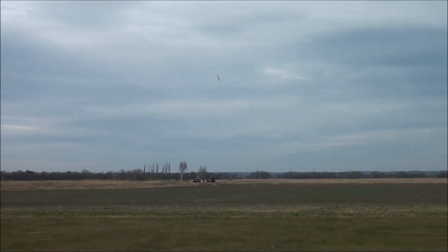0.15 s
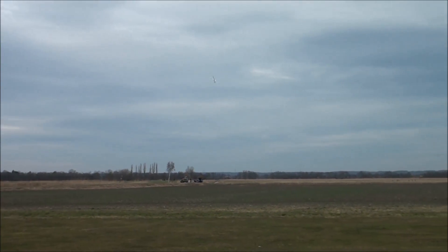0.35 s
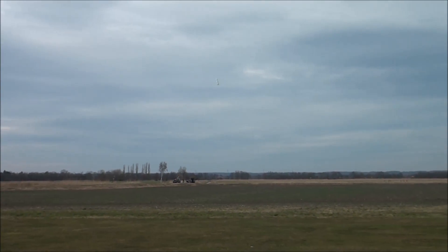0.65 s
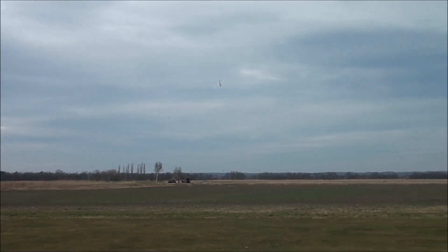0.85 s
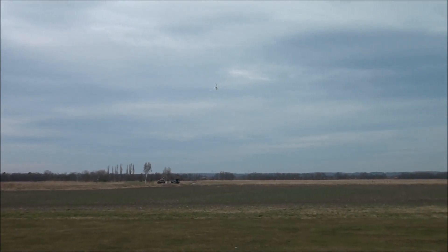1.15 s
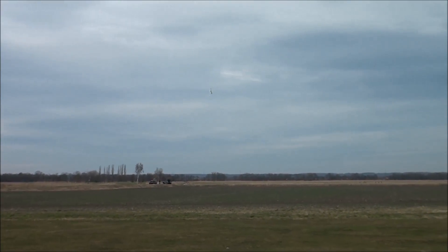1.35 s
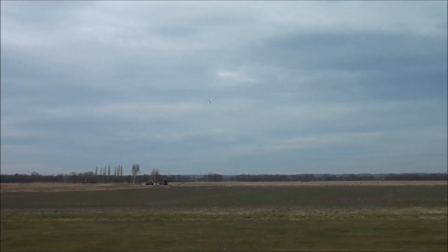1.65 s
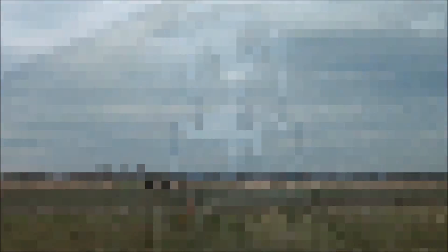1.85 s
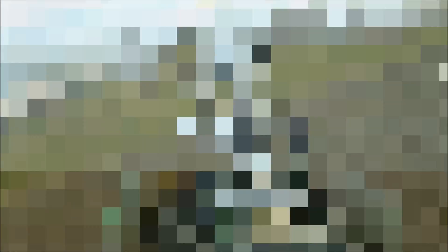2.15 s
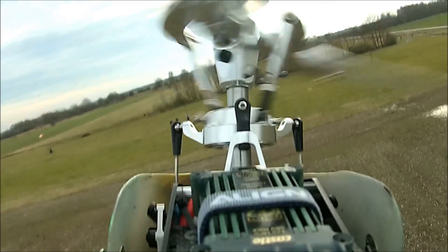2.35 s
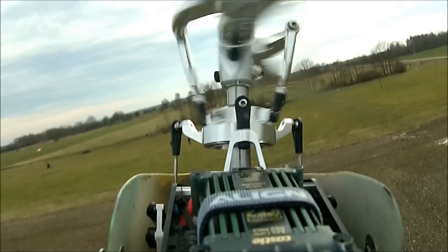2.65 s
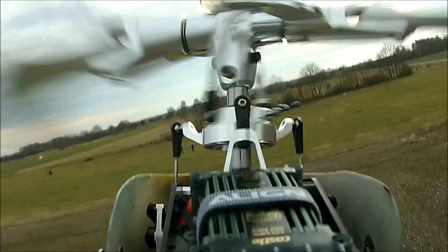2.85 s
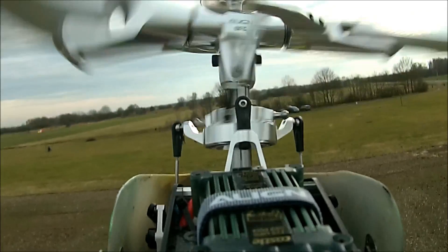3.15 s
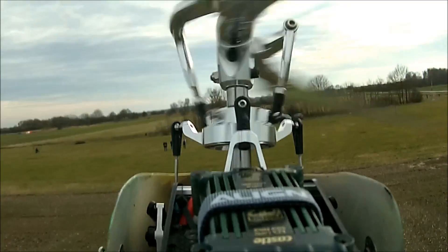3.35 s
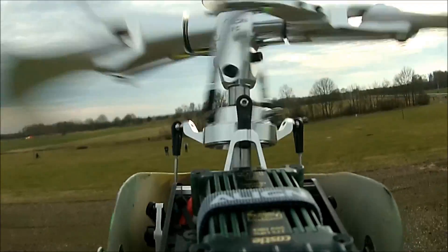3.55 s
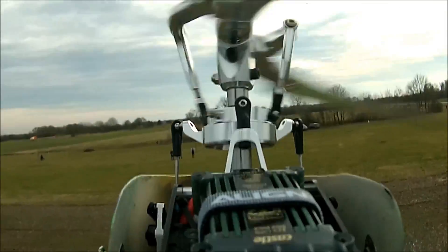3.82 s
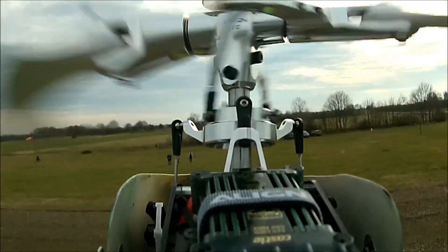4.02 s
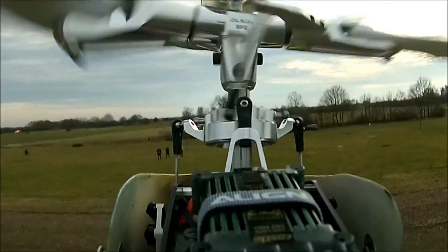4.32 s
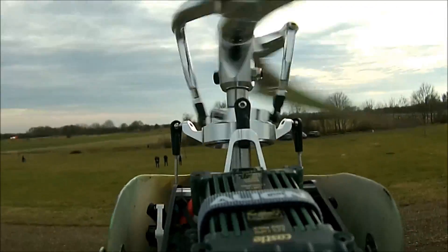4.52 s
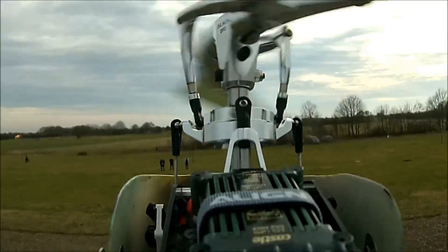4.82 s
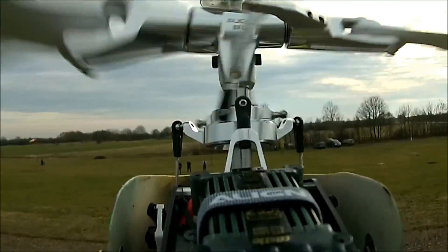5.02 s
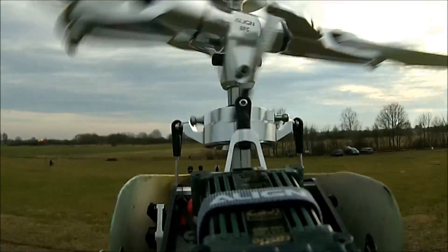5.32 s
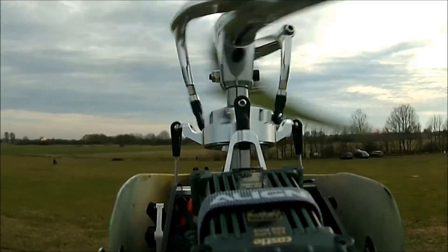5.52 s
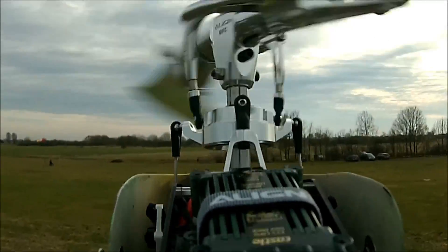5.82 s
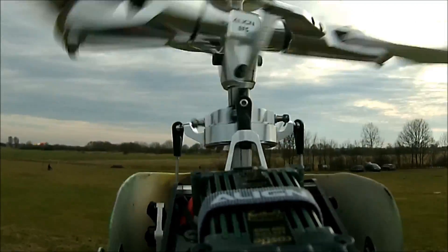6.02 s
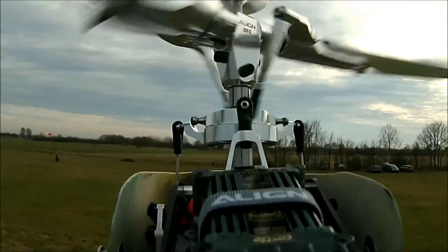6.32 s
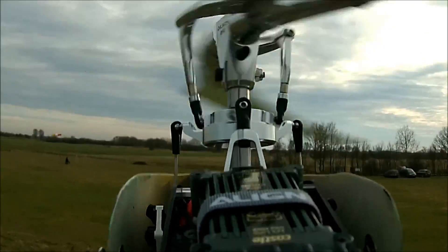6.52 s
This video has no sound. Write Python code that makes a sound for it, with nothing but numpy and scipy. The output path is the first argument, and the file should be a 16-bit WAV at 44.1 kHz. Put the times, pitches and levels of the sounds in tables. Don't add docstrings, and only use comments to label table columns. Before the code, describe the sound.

From 0 to about 1.9 s, a stereo microphone stands in a windy open field. A heavy low gust opens the sound, followed by shorter dull thumps and fluttering edges that shift between left and right, easing by 1.3 s with another soft buffet near 1.5 s. Behind it, a distant model helicopter gives a thin motor tone around 600 Hz, rising slightly, with higher gear whine and hissy air chopped about seventy times a second; a brief crisp blade slap fades early and the machine recedes. Around 1.9-2.1 s it crossfades to a mono microphone on the airframe. A harsh, overloaded square-wave drone near 340 Hz holds almost constant pitch until 6.6 s, with metallic rattle, sharp chatter and gritty hiss pulsing about 23 times a second. The roughness swells and eases; level rises modestly by 4.3 s. It ends still running.

```python
import sys
import numpy as np
from scipy import signal
from scipy.fft import rfft, irfft, next_fast_len
from scipy.io import wavfile
from scipy.ndimage import uniform_filter1d, map_coordinates

SR = 44100
rng = np.random.default_rng(int(sys.argv[2]) if len(sys.argv) > 2 else 0)


def how_loud(loudness_db):
    steps = np.asarray(loudness_db, float) / 20
    return 10 ** steps


def pcm_store(signal):
    levels = np.round(np.clip(np.atleast_2d(signal), -1, 1) * 32767)
    wavfile.write(sys.argv[1], SR, levels.astype(np.int16).T)


N = 294147
TIME_S = np.arange(N) / SR

# start_s, peak_db, left_minus_right_db
SMALL_EDDIES = [(0.222, -3, -2), (0.315, -18, -5), (0.767, -7, 4), (0.798, -24, 0), (1.193, -12, 20),
                (1.59, -4.5, 6), (1.705, -21, 12), (1.806, -17, 11), (1.829, -13, 7), (1.874, -26, -4)]
BIG_EDDIES = [(0.003, 8.5, -3), (0.049, -9, 3), (0.07, 8, -6), (0.099, 3, -8), (0.156, -11, -4),
              (0.177, -1, -0.5), (0.209, -9, 6), (0.266, 2, -2), (0.282, 0, 6), (0.321, -6, -10),
              (0.332, 3, 6), (0.42, -3.5, 10), (0.463, -3.5, -1.5), (0.568, 1.5, 5), (0.725, -22, -2),
              (0.789, -10, 4), (0.814, -17, -1), (1.033, -24, 4), (1.192, -0.5, 1), (1.525, -17, 1),
              (1.615, -2.5, 5), (1.705, -6.5, 2), (1.75, -11, 0.5), (1.818, -2, 2), (1.88, -12, 2)]
SMALL_EDDY_HZ, BIG_EDDY_HZ = 560, 161.5
# start_s, hold_s, buffet_db, sharp_edge_db
GUSTS = [(0, 0.25, -3.5, -3), (0.225, 0.013, -14.5, 2.5), (0.33, 0.03, -8, -7), (.41, 0.052, -16.5, -3.5),
         (0.55, 0.034, -14, -0.5), (0.743, 0.079, -10, -4), (1.148, 0.052, -19.5, -4),
         (1.36, 0.016, -25, -9), (1.496, .13, -18.5, -7.5), (1.707, 0.028, -18.5, -3),
         (1.819, 0.086, -24, 5.5)]
GUST_RISE_S, GUST_FALL_S = 0.036, 0.034
# time_s, level_db
BREEZE = [(0, -27), (.7, -14), (1, -21.5), (1.3, -27), (1.93, -30), (2.06, -35)]
BREEZE_EDGE_DB = -12
# frequency_hz, level_db_per_hz
BUFFET_COLOUR = [(12, -42), (20, -8), (114, 2.5), (173, -11), (242, -5.5), (280, -12.5), (398, -17.5),
                 (500, -40), (650, -68), (1100, -120)]
EDGE_COLOUR = [(120, -1), (200, -3), (396, -13), (758, -29), (824, -27), (1500, -44.5), (1950, -63),
               (3300, -120)]

# time_s, level_db, gear_side_db
FAR_PATH = [(0, -38, -11), (.15, -38.5, -12.5), (.36, -37.5, -5.5), (.62, -37.5, -6.5), (.9, -42.5, -15),
            (1.2, -44, -9), (1.42, -46.5, -20.5), (1.65, -51, -9.5), (1.88, -61.5, -7.5)]
# multiple_of_motor_order, level_db
MOTOR_LINES = [(1.001, -5), (2, -10), (2.498, -31), (2.625, -11), (3, -8.5), (3.125, -36), (4.123, -15.5)]
GEAR_LINES = [(5.74, -3), (5.97, -4), (6.45, -0.5), (6.565, 4.5), (12.9, -14)]
# frequency_hz, level_db_per_hz
RUSH_COLOUR = [(280, -34), (480, -10), (626, -2), (1010, -9), (1240, -4.5), (1340, -5.5), (1940, -8.5),
               (2400, -10.5), (3100, -12), (4030, -58), (6820, -120)]
WHINE_COLOUR = [(1760, 2), (3000, -5.5), (3430, 3), (3780, -1), (4090, -2.5), (4240, -2.5), (5400, -25),
                (7020, -44), (11900, -120)]
HISS_COLOUR = [(2940, -23), (5000, -1.5), (5390, -7), (6400, -7), (6930, -7), (7840, -5.5), (8220, -4.5),
               (8790, -11), (9750, -11.5), (11300, -20), (14700, -24), (15500, -20)]
SLAP_COLOUR = [(4500, -40), (6000, -13), (7800, 3), (10500, -7), (12500, -35)]
MOTOR_HZ, RISE_HZ_PER_S, BEND_HZ_PER_S2 = 604.5, 8.5, 4
MOTOR_DB, MOTOR_FADE_SHARE = -47.5, 0.72
WHINE_DB, HISS_DB = 4, -13
WHINE_BEAMS = 2.1
HISS_OFF_GEAR = 0.28
ORDERS_PER_BLADE, BLADE_PHASE_TURNS = 8.69, 0.57
SLAP_DB, SLAP_S, SLAP_SHARPNESS = -1, 0.18, 9
GROUND_MS, GROUND_MS_PER_S, GROUND_SHARE = 0.14, 0.033, 0.23
PATCHY_DB = 1.1

# time_s, rail_db
RAIL = [(1.9, -35), (2.1, -23.5), (2.3, -20.5), (2.55, -22.5), (2.95, -22), (4.3, -17.5), (4.85, -17),
        (5.6, -17.5), (6.65, -17.5)]
# time_s, throb_per_turn_db (signed)
STICK = [(2.025, 5), (2.26, -4), (2.54, 6.5), (2.79, -3.5), (3.25, -6), (3.42, -2), (3.65, -1.5),
         (3.88, -2.5), (4.27, 6), (4.42, 0.5), (4.65, -4), (4.9, 0), (5.17, 2.5), (5.4, 7), (5.95, 5),
         (6.15, 7), (6.65, -6.5)]
# time_s, mesh_hz
MESH = [(1.9, 338.72), (2.3, 338.85), (3.1, 339.65), (3.9, 339.72), (4.3, 339.26), (4.7, 339.88),
        (5.1, 340.08), (5.9, 339.79), (6.62, 340.49)]
# multiple_of_mesh, level_db
TAIL_SHAKE = [(.4643, -19)]
TAIL_RATTLE = [(2.4643, -19), (4.4643, -19), (6.4643, -17)]
# multiple_of_mesh, multiple_of_rotor_turns, level_db, phase_turns
LOCKED_RATTLE = [(3, -2, -3, .5), (5, -2, -8, 0)]
# frequency_hz, level_db_per_hz
FRAME_COLOUR = [(30, -11.5), (200, -9), (600, -5), (1000, -5), (2000, -7), (4000, -15), (8000, -39.5)]
DOWNWASH_COLOUR = [(20, 0.5), (150, -7.5), (600, -10), (2000, -11), (6000, -22), (15000, -39.5)]
CHATTER_COLOUR = [(1500, -11), (4000, 1.5), (9000, -4), (16000, -11.5)]
TEETH_PER_TURN = 14.5
RATTLE_DB, RATTLE_PER_THROB = -1.81, 0.27
SNAP_DB, SNAP_SCATTER_DB, SNAP_TOP_DB = -19, 3.5, -3
NEAR_TOP_HZ = 15330
CHANGE_S, CHANGE_FADE_S = 1.871, 0.045


def unit(x):
    return x / np.sqrt(np.mean(x ** 2) + 1e-20)


def curves(rows):
    s, *cols = np.transpose(rows)
    return [np.interp(TIME_S, s, c) for c in cols]


def wobble(rate):
    points = rng.standard_normal(int(N * rate / SR) + 4)
    return map_coordinates(points, [TIME_S * rate])


def filtered(x, response):
    m = next_fast_len(N + 8192)
    return irfft(rfft(x, m) * response(np.fft.rfftfreq(m, 1 / SR)), m)[..., :N]


def noise(colour):
    f, db = np.transpose(colour)
    response = lambda hz: how_loud(np.interp(np.log(hz + 1), np.log(f + 1), db, -120, -120))
    return unit(filtered(rng.standard_normal(N), response))


def pair(colour, side_db):
    mid = noise(colour)
    side = how_loud(side_db) * noise(colour)
    return np.array([mid + side, mid - side])


def sine(turns):
    return np.sqrt(2) * np.sin(2 * np.pi * turns)


def tones(turns, lines, drift_db, geared=False):
    total = 0
    for multiple, db in lines:
        phase = rng.random() * (not geared)
        total = total + how_loud(db + drift_db * wobble(7)) * sine(multiple * turns + phase)
    return total


def ground_camera_hiss():
    hiss = pair([(200, 0), (4000, -8), (15700, -10)], side_db=-12)
    return how_loud(-66) * hiss * (TIME_S < 2)


def gust_levels():
    power = how_loud(2 * curves(BREEZE)[0])
    edge = power * how_loud(2 * BREEZE_EDGE_DB)
    for s, hold, db, edge_db in GUSTS:
        before = (s - TIME_S) / GUST_RISE_S
        after = (TIME_S - s - hold) / GUST_FALL_S
        gust = how_loud(2 * (db - 10 * np.maximum(0, np.maximum(before, after))))
        power = power + gust
        edge = edge + gust * how_loud(2 * edge_db)
    return 10 * np.log10(power), 10 * np.log10(edge / power)


def add_eddies(out, eddies, hz, gain_db, lag):
    t = np.arange(-700, 700) / SR
    swell = np.exp(-(1.5 * hz * t) ** 2)
    for s, db, pan_db in eddies:
        phase, spread = rng.random(2)
        swing_turns = hz * t + phase + 0.04 * spread * np.array([[1], [-1]])
        push = swell * np.cos(2 * np.pi * swing_turns)
        at = round((s + lag / hz) * SR)
        port_db = db + gain_db + np.array([[pan_db / 2], [-pan_db / 2]])
        out[:, at:at + len(t)] += how_loud(port_db) * push


def wind():
    buffet_db, edge_db = gust_levels()
    lumps = wobble(30.37)
    body = how_loud(2 * lumps) * pair(BUFFET_COLOUR, side_db=-14)
    port_wobble = np.array([wobble(60.57), wobble(60)])
    edge = how_loud(edge_db - 2 + 0.95 * lumps + 6.2 * port_wobble) * pair(EDGE_COLOUR, side_db=-1.5)
    eddies = np.zeros((2, N + 700))
    add_eddies(eddies, BIG_EDDIES, BIG_EDDY_HZ, gain_db=-11.5, lag=0.32)
    add_eddies(eddies, SMALL_EDDIES, SMALL_EDDY_HZ, gain_db=-15, lag=1.3)
    out = how_loud(buffet_db - 10.5) * (body + edge) + eddies[:, 700:]
    out *= np.clip(np.arange(N) / 60, 0, 1)
    limited = 0.9 * np.tanh(out / 0.9)
    return limited * np.clip((2.2 - TIME_S) / 0.2, 0, 1)


def over_field(x):
    n = np.arange(3 * SR)
    late = n - (GROUND_MS + GROUND_MS_PER_S * n / SR) * SR / 1000
    heard = np.array([c[n] + GROUND_SHARE * np.interp(late, n, c[n]) for c in x])
    z = signal.stft(heard, nperseg=512)[2]
    patches = rng.standard_normal(z.shape[1:])
    for axis in (0, 1):
        patches = uniform_filter1d(patches, size=8, axis=axis)
    heard = signal.istft(z * how_loud(PATCHY_DB * unit(patches)), nperseg=512)[1][:, :len(n)]
    return np.pad(heard, ((0, 0), (0, N - len(n))))


def far_helicopter():
    rush_db, gear_db = curves(FAR_PATH)
    motor_hz = MOTOR_HZ + RISE_HZ_PER_S * TIME_S + BEND_HZ_PER_S2 * TIME_S ** 2
    turns = np.cumsum(motor_hz * (1 + 0.0028 * wobble(29.37))) / SR
    blade = np.cos(2 * np.pi * (turns / ORDERS_PER_BLADE - BLADE_PHASE_TURNS))

    motor_db = MOTOR_DB + MOTOR_FADE_SHARE * (rush_db + 45.5)
    whine_db = rush_db + WHINE_DB + WHINE_BEAMS * gear_db
    motor = how_loud(motor_db) * tones(turns, MOTOR_LINES, drift_db=1)
    gears = how_loud(whine_db) * tones(turns, GEAR_LINES, drift_db=-4.5)

    rush = pair(RUSH_COLOUR, side_db=-14)
    whine = how_loud(gear_db + 6.5 + wobble(24.75)) * pair(WHINE_COLOUR, side_db=-15.5)
    hiss_db = HISS_DB - HISS_OFF_GEAR * (gear_db + 9) + 0.38 * wobble(40)
    hiss = how_loud(hiss_db) * pair(HISS_COLOUR, side_db=-16.5)
    chop_db = rush_db + 0.03 + 2.36 * blade + 0.57 * wobble(15.8)
    air = how_loud(chop_db) * (rush + whine + hiss)

    slap_db = rush_db + SLAP_DB - 10 * TIME_S / SLAP_S + 3 * wobble(50)
    slap = how_loud(slap_db) * np.exp(SLAP_SHARPNESS * (blade - 1)) * pair(SLAP_COLOUR, side_db=-18)
    return over_field(motor + gears + air + slap) * np.clip((2.05 - TIME_S) / 0.23, 0, 1)


def frame_rattle(teeth, turns, level):
    throb_db = curves(STICK)[0]
    locked = 0
    for mesh, rotor, db, phase in LOCKED_RATTLE:
        locked = locked + how_loud(db) * sine(mesh * teeth + rotor * turns + phase)
    locked = how_loud(-3.5 + 0.85 * np.abs(throb_db)) * locked
    loose = tones(teeth, TAIL_RATTLE, geared=True, drift_db=2)
    return level * (locked + loose + 0.65 * noise(FRAME_COLOUR))


def airframe_camera():
    rail_db, throb_db = curves(RAIL)[0], curves(STICK)[0]
    rattle_db = RATTLE_DB + RATTLE_PER_THROB * np.abs(throb_db)
    teeth = np.cumsum(curves(MESH)[0]) / SR
    turns = teeth / TEETH_PER_TURN - 0.39
    early_db = 1.3 * throb_db * np.cos(2 * np.pi * (turns - 0.22))
    late_db = 1.1 * throb_db * np.cos(2 * np.pi * (turns - 0.27))
    rattle_level = how_loud(1.8 * rattle_db - 2.44 + late_db + 0.71 * wobble(30))
    rattle = frame_rattle(teeth, turns, rattle_level)
    chatter_db = np.minimum(2.2 * rattle_db - 0.7 + early_db + wobble(60), 5)
    chatter = how_loud(chatter_db) * noise(CHATTER_COLOUR)

    shake = np.sin(2 * np.pi * teeth) + tones(teeth, TAIL_SHAKE, geared=True, drift_db=1.5)
    jolt = shake + 0.09 * rattle + 0.21 * noise(DOWNWASH_COLOUR)
    edges = np.clip(25 * jolt, -1, 1)
    rails = np.clip(25 * (jolt + 0.13 * chatter), -1, 1)

    torn = (-np.sign(rails) * rattle > 1.05) ^ (chatter > 2.9)
    changes = np.diff(torn, prepend=False)
    starts = np.maximum.accumulate(np.where(changes, np.arange(N), 0))
    depth = 0.62 + 1.09 * rng.random(N)[starts]
    input_hiss = 0.061 * noise([(300, -33), (3000, 1), (15000, 5)])
    stuck = rails * (1 - depth * torn) + input_hiss

    snap_db = SNAP_DB + 1.7 * early_db + SNAP_SCATTER_DB * wobble(330) + 1.4 * wobble(16)
    snap = how_loud(np.minimum(snap_db, SNAP_TOP_DB)) * np.diff(edges, 3, prepend=[0, 0, 0])
    smooth = filtered(stuck + snap, lambda hz: (hz < NEAR_TOP_HZ) / np.sqrt(1 + (hz / 21000) ** 2))
    return how_loud(rail_db - 0.02) * smooth * np.clip((TIME_S - CHANGE_S) / CHANGE_FADE_S, 0, 1)


def scene():
    return ground_camera_hiss() + wind() + far_helicopter() + airframe_camera()


def low_pass(x):
    return signal.sosfilt(signal.butter(12, 15670, fs=SR, output="sos"), x)


def record(dry):
    return low_pass(dry)


dry = scene()
out = record(dry)
pcm_store(out)
```